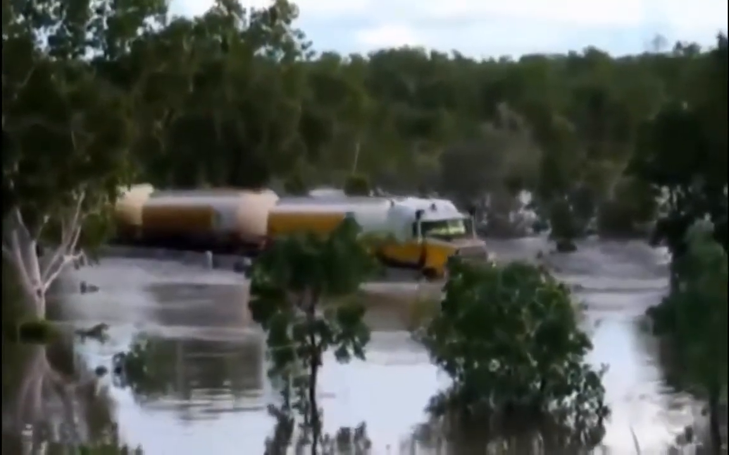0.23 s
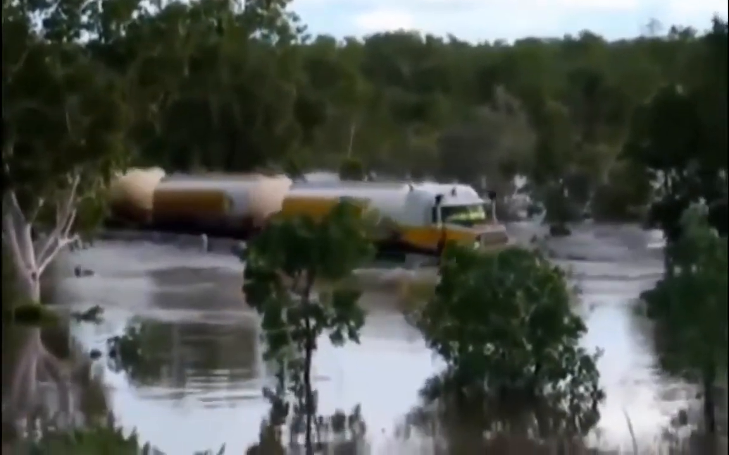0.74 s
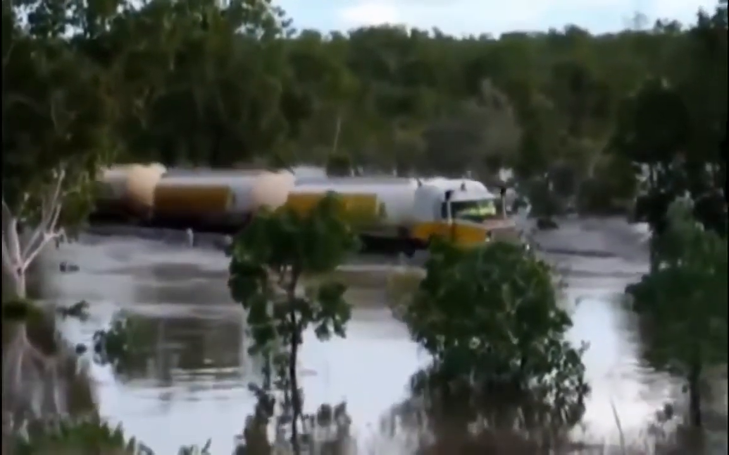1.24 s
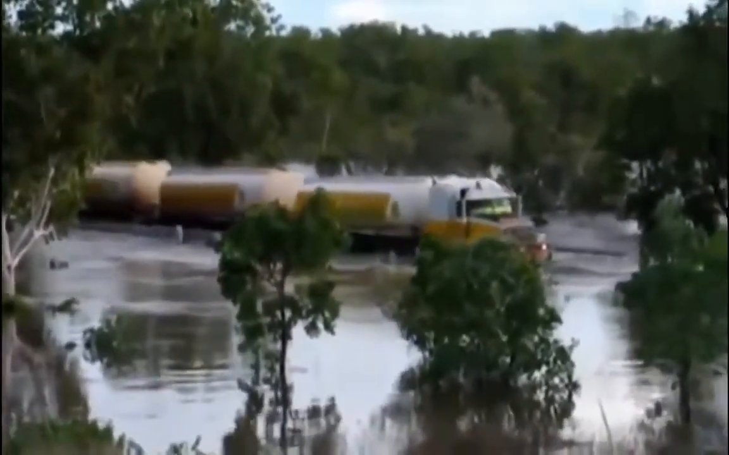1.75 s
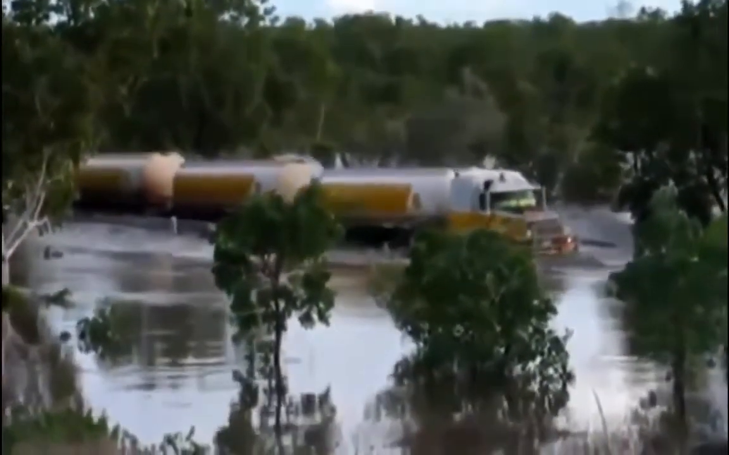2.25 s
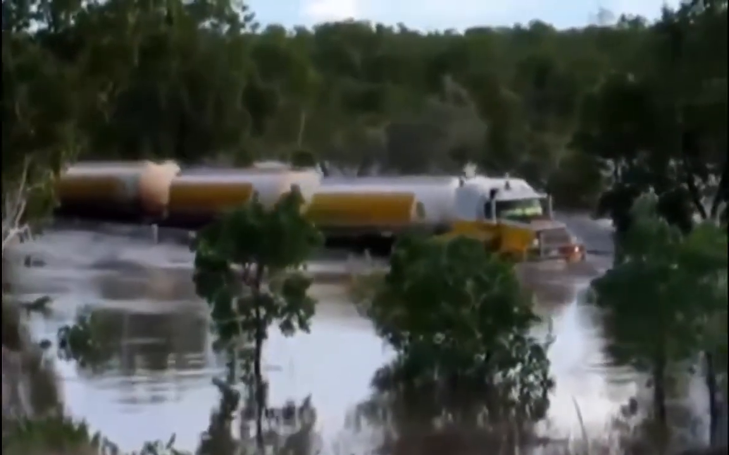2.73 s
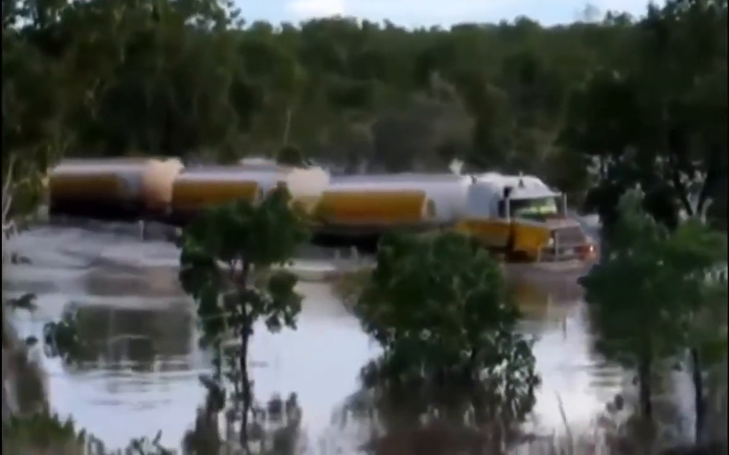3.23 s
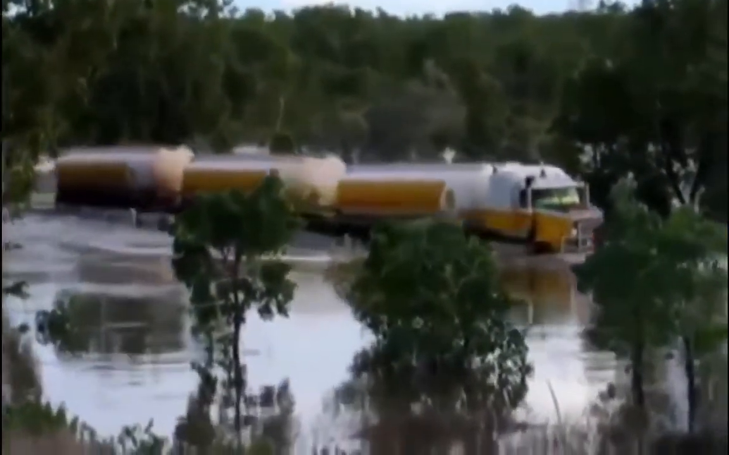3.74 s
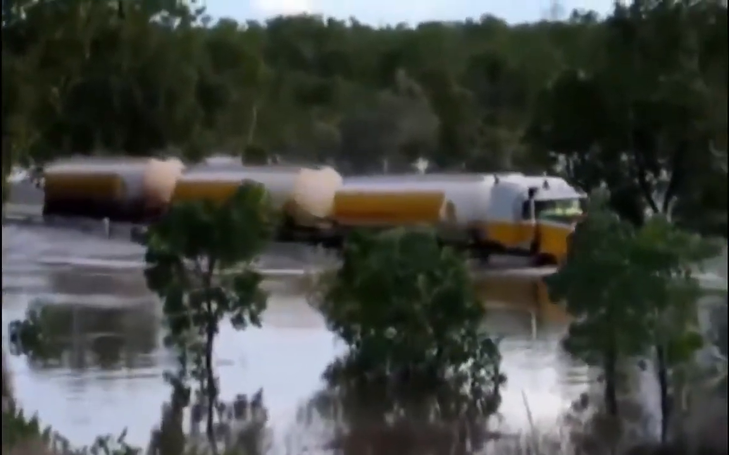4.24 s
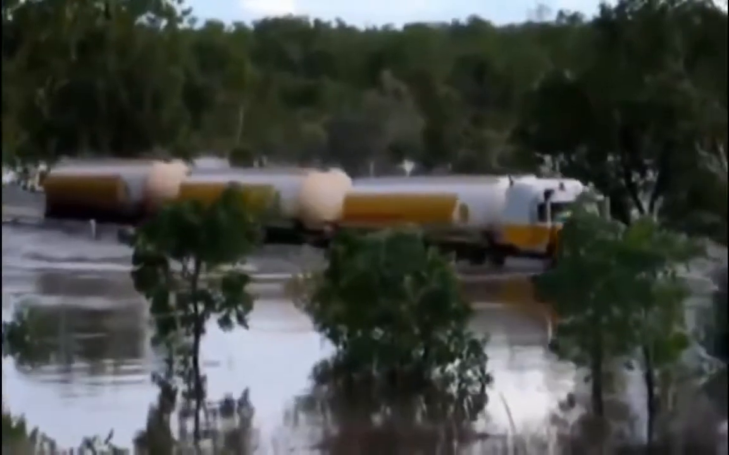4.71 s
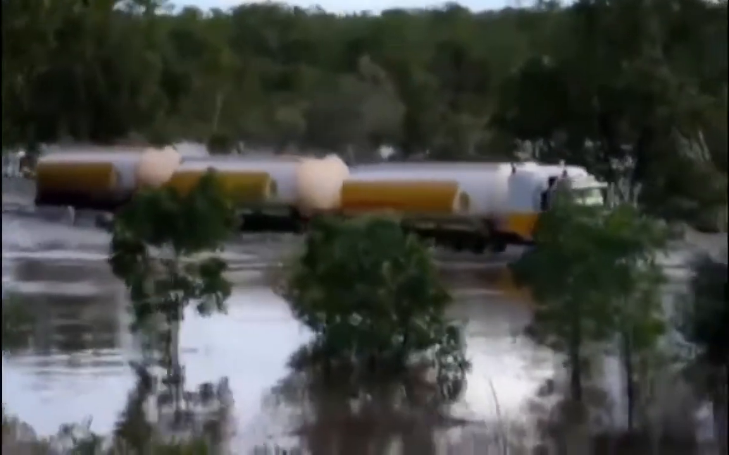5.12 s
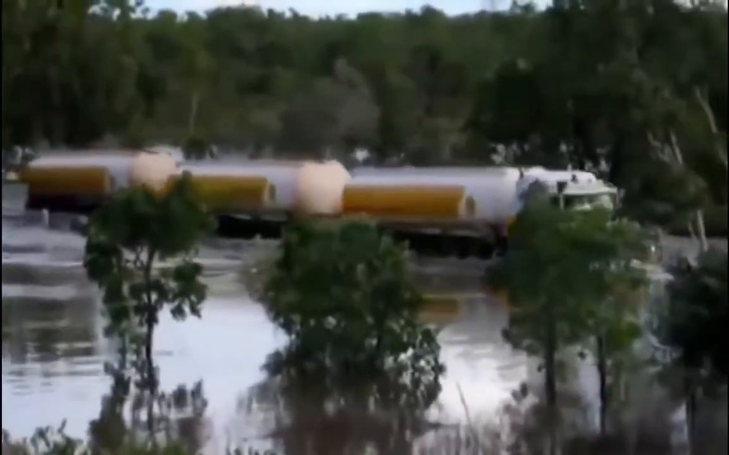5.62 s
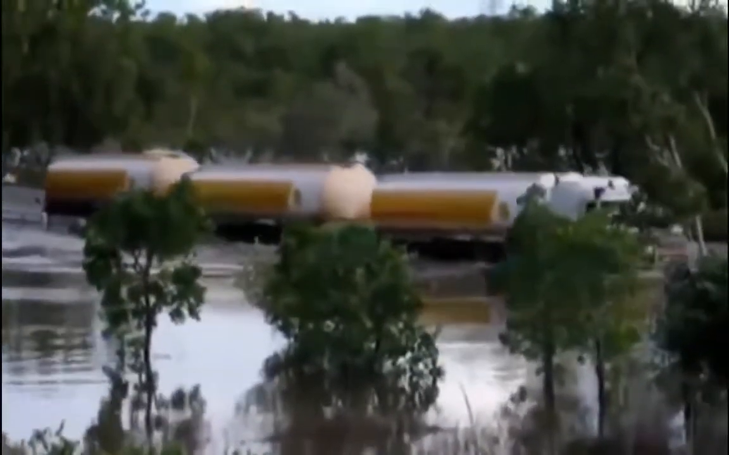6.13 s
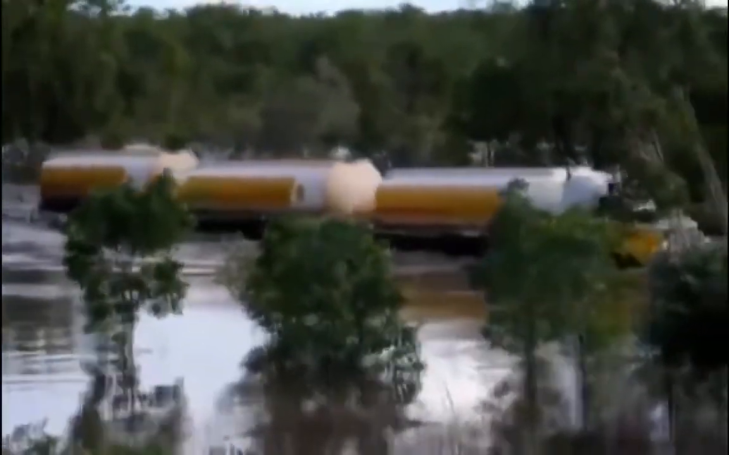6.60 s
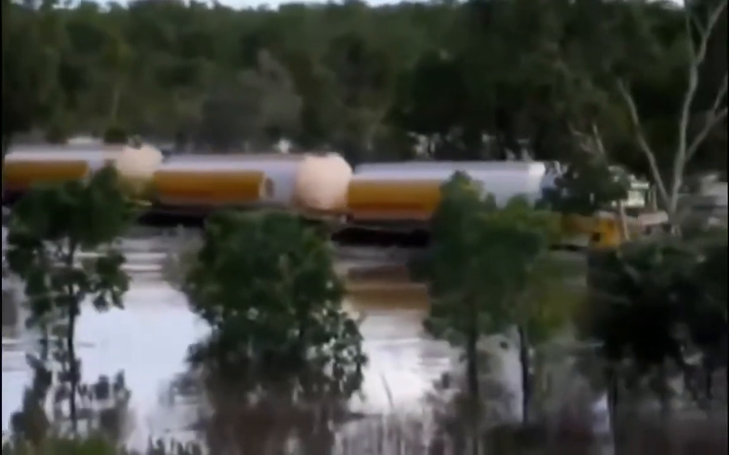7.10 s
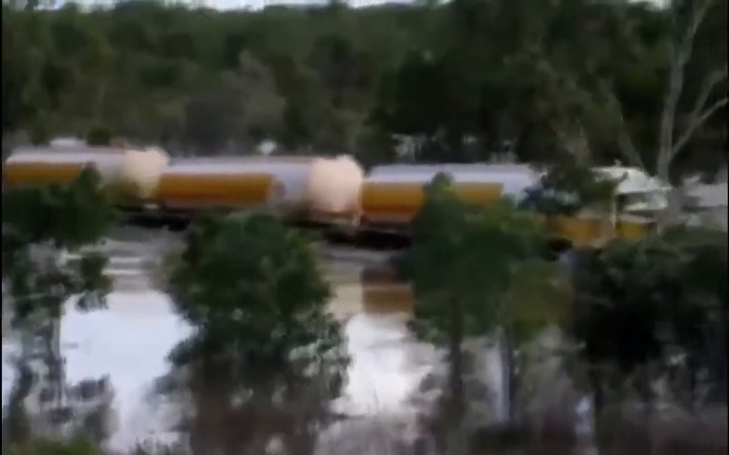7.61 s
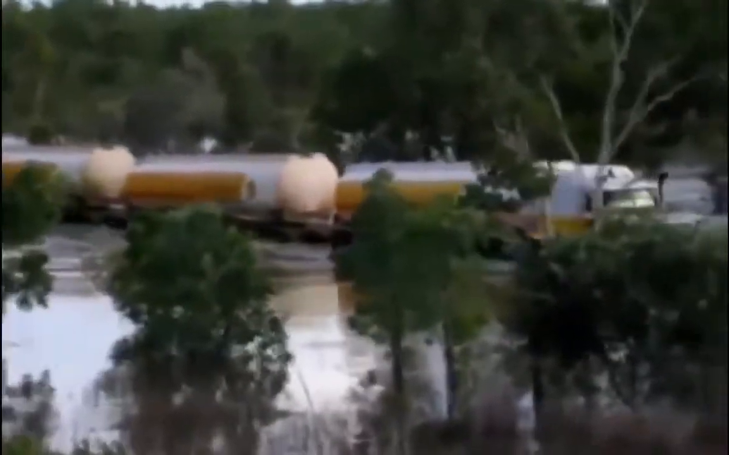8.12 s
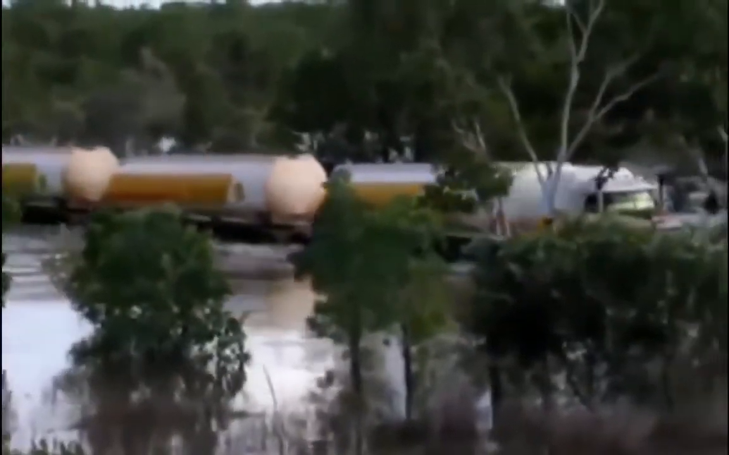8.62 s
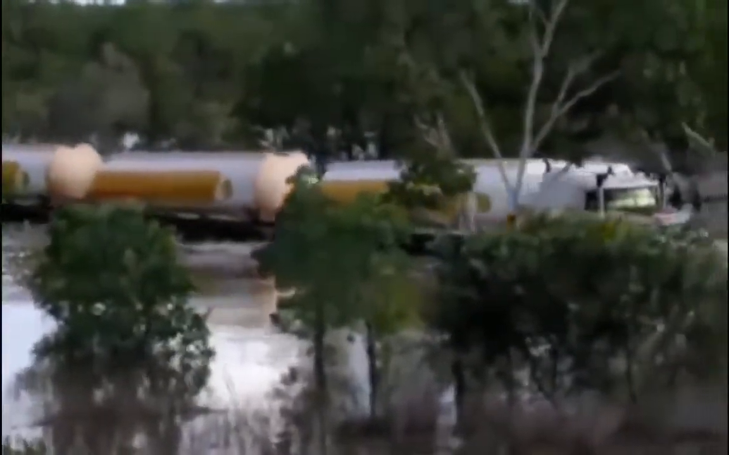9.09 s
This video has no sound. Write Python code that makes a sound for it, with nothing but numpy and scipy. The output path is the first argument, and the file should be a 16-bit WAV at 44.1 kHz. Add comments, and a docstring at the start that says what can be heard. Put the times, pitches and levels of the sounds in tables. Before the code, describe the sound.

A quiet wash of churning water gives way abruptly to a wading tanker truck's loud diesel drone and gusty wind rumble.

```python
"""A road train's diesel drones as the truck wades through flood water.
First only its wash is heard: rush, churn, two sheets of spray, plus a faint far hum and one tick.
At 4.2 s the engine cuts in loud: exhaust harmonics, a broad roar, a raspy whine that swells twice.
Wind buffets the microphone; the recorder clips and turns down briefly after the hardest gusts."""
import sys
import numpy as np
from scipy import signal
from scipy.fft import rfft, irfft, next_fast_len
from scipy.io import wavfile
from scipy.ndimage import uniform_filter1d, map_coordinates

SR = 44100
rng = np.random.default_rng(int(sys.argv[2]) if len(sys.argv) > 2 else 0)


def unload_audio(sound):
    """Save the sound as a 16-bit wav file, at the path given as the first command line argument."""
    columns = np.transpose(np.atleast_2d(sound))
    # keep every value between -1 and 1, then stretch to whole-number steps
    steps = np.round(np.clip(columns, -1, 1) * 32767)
    wavfile.write(sys.argv[1], SR, steps.astype(np.int16))


N = 412335

# wash: time_s, rush_db, spray_db
WASH_LEVELS = [(0, -39, -48.5), (.7, -40, -50.5), (1.33, -39.8, -51), (1.55, -38.5, -47), (1.9, -38, -48),
               (2.3, -38.3, -44), (3.1, -38.8, -47), (4.2, -37.5, -46.5)]
# churning water: time_s, level_db
CHURN_LEVEL = [(0, -51.5), (1.35, -56.5), (1.6, -47), (2.3, -49), (2.8, -45.5), (3.05, -54), (4.2, -49)]
# sheets of spray: peak_s, level_db, rise_s
SPRAY_SHEETS = [(2.82, -37.5, 0.26), (4.09, -37, 0.079)]
# far engine: time_s, pitch_hz, level_db
FAR_HUM = [(0, 129.8, -48), (.65, 133.6, -51), (1.15, 133.5, -49.5), (1.55, 125.8, -50),
           (2.0, 127.5, -45.5), (2.35, 133.5, -46), (2.75, 128.8, -46), (3.1, 124.2, -48),
           (4.2, 123.4, -45.5)]
# deep hum: time_s, pitch_hz, level_db
DEEP_HUM = [(2.0, 25, -70), (2.3, 28.1, -55), (2.85, 41.8, -50), (3.6, 36.8, -63), (4.2, 36, -54)]

# near engine: time_s, firing_hz
FIRING_RATE = [(4.2, 83), (4.8, 81.3), (5.8, 81.4), (6.4, 80.2), (7.3, 80.4), (8.3, 80.5), (9.35, 81)]
# exhaust boom: time_s, harmonic2_db, harmonic3_db
BOOM_LEVELS = [(4.2, -17.5, -23), (4.75, -17.5, -22), (5.12, -22, -21.5), (5.28, -14.5, -22),
               (5.5, -17.5, -17.5), (5.88, -13, -20), (6.0, -19.5, -22), (6.2, -15.5, -20.5),
               (6.55, -14, -24.5), (7.0, -18.5, -19.5), (7.6, -17, -20.5), (7.95, -15, -16),
               (8.2, -16.5, -23.5), (8.45, -13, -16), (9.35, -11.5, -14)]
# engine roar: time_s, level_db
ROAR_ENVELOPE = [(4.2, -21), (4.6, -24), (5.3, -23.5), (5.85, -21), (6.3, -24), (7.1, -21), (7.5, -24),
                 (7.9, -18.5), (8.2, -22), (8.5, -17.5), (9.35, -16.5)]
# weak exhaust orders at peak roar: firing_multiple, level_re_roar_db
EXHAUST_ORDERS = [(1, -16), (4, -16), (6, -15), (7, -16), (12, -21), (13, -21)]
# hum beside the drone: pitch_hz, level_re_roar_db
SIDE_TONES = [(70.5, -18), (174, -5.5)]
# whine swells: peak_s, level_db, rise_s, fall_s
WHINE_SWELLS = [(5.33, -31, .21, .13), (5.559, -25.5, 0.0394, .07), (5.809, -24.5, .15, .1),
                (8.56, -24, 0.25, .6)]
# wind rumble: time_s, level_db
WIND_LEVEL = [(4.2, -15), (4.55, -15.5), (4.9, -16.5), (5.5, -15.5), (6.2, -15.5), (6.7, -15.5),
              (7.5, -15.5), (8.25, -14.5), (8.36, -23.5), (9.35, -20.5)]
# gusts: peak_s, half_width_s, rumble_db, bluster_db
WIND_GUSTS = [(4.238, .02, -12, -14), (4.36, 0.0043, -28.5, 4), (4.527, 0.062, -8.5, -10),
              (4.633, .025, -5, -19), (4.684, 0.0074, -13.5, 0.5), (4.871, 0.026, -17.5, -17),
              (5.04, 0.043, -7.5, -22), (5.313, .025, -9, -15.5), (5.40, 0.018, -13.5, -12),
              (5.578, .02, -15, -21), (5.663, 0.013, -15, -12.5), (5.79, 0.017, -21.5, -10.5),
              (5.946, 0.014, -9, -7), (6.11, .02, -16, -16), (6.222, 0.018, -19, -5),
              (6.29, 0.037, -12, -15), (6.364, 0.0063, -15.5, 0.5), (6.544, .006, -8.5, -0.5),
              (6.85, .025, -5, -17), (7.022, .025, -11, -11), (7.315, .013, -12.5, -4.5),
              (7.435, 0.0069, -10, 1), (7.603, 0.04, -8, -14), (8.147, .03, -7, -21),
              (8.225, 0.018, -8.5, -14.5)]
# dips in engine and wind: centre_s, half_width_s, depth_db
LEVEL_DIPS = [(4.733, .03, -0.5), (4.924, 0.015, 5.5), (5.122, .035, 5.5), (5.445, 0.034, 1.5),
              (5.993, 0.031, 5), (6.593, 0.021, 5), (6.892, 0.041, 4.5), (7.472, 0.034, 2),
              (8.099, .01, 6.5), (8.256, 0.0091, 6.5)]

# noise spectra: freq_hz, density_db
RUSH_SPECTRUM = [(15, -26), (30, -7), (80, 4.5), (150, 2.5), (230, 0.5), (400, 0), (520, -7), (870, -3.5),
                 (1380, -7.5), (1630, -2), (1850, -6), (2170, 2.5), (2700, -7), (4500, -12.5), (11000, -45)]
CHURN_SPECTRUM = [(300, -45), (620, -3.5), (860, 3.5), (1150, -1.5), (1700, -42.5)]
SPRAY_SPECTRUM = [(1500, -26), (2900, 3), (3500, -2.5), (4100, 3), (4700, -4), (5800, 2.5), (7600, -2),
                  (9000, -9), (10900, -10.5), (11200, -30), (15000, -31)]
TICK_SPECTRUM = [(1000, -25), (2000, -4), (3200, -0.5), (4500, -9), (10000, -17.5), (12000, -35)]
ROAR_SPECTRUM = [(60, -22.5), (180, 15), (380, -8), (560, 4.5), (760, 0.5), (1050, 3.5), (1350, -5),
                 (1600, -2.5), (1850, -6.5), (2120, -2), (3250, -8), (3800, -20.5), (4500, -28),
                 (5300, -44), (9000, -49.5), (15000, -61.5)]
RUMBLE_SPECTRUM = [(15, -32.5), (35, -8), (70, 1.5), (130, 1), (200, -3.5), (300, -7), (600, -28.5),
                   (1500, -102)]
BLUSTER_SPECTRUM = [(90, -7.5), (200, 7.5), (300, 3.5), (450, -0.5), (700, -14), (1400, -31.5), (3300, -46),
                    (4800, -91)]
# whine band and its whistling core: offset_from_centre_hz, density_db
WHINE_SIDEBANDS = [(130, 0), (250, -3), (420, -8), (700, -14), (1000, -30), (1800, -65)]
WHISTLE_SIDEBANDS = [(25, 0), (60, -14), (200, -45), (800, -120)]

TIME_S = np.arange(N) / SR


def amp(db):
    """Decibels to gain."""
    return 10 ** (np.asarray(db) / 20)


def unit_rms(x):
    """Scale to rms 1."""
    return x / np.sqrt(np.mean(x ** 2) + 1e-20)


def curves(rows):
    """Per-sample curve for each column after time_s."""
    times_s, *columns = np.transpose(rows)
    return [np.interp(TIME_S, times_s, column) for column in columns]


def bell(peak_s, rise_s, fall_s):
    """Two-sided Gaussian, height 1."""
    age_s = TIME_S - peak_s
    width_s = np.where(age_s < 0, rise_s, fall_s)
    return np.exp(-np.minimum((age_s / width_s) ** 2, 20))


def wobble(rate_hz):
    """Smooth random curve, rate_hz knots a second."""
    knots = rng.standard_normal(int(N * rate_hz / SR) + 4)
    return map_coordinates(knots, [TIME_S * rate_hz])


def filtered(x, response):
    """FFT filter with gain response(hz)."""
    size = next_fast_len(N + 8192)
    return irfft(rfft(x, size) * response(np.fft.rfftfreq(size, 1 / SR)), size)[:N]


def noise(spectrum, patchy_db):
    """Coloured noise, rms 1, with random gain patches in time and frequency."""
    bins = signal.stft(rng.standard_normal(N), nperseg=512)[2]
    patches = uniform_filter1d(rng.standard_normal(bins.shape), size=5, axis=0)
    patches = unit_rms(uniform_filter1d(patches, size=8, axis=1))
    patchy = signal.istft(bins * amp(patchy_db * patches), nperseg=512)[1][:N]
    freq_hz, density_db = np.transpose(spectrum)
    response = lambda hz: amp(np.interp(np.log(hz + 1), np.log(freq_hz), density_db))
    return unit_rms(filtered(patchy, response))


def to_cycles(hz):
    """Integrate frequency to phase."""
    return np.cumsum(hz) / SR


def tone(cycles):
    """Sine, rms 1, random start phase."""
    return np.sqrt(2) * np.sin(2 * np.pi * (cycles + rng.random()))


def wash():
    """Water rushes and churns along the trailers; two sheets of spray rise and collapse."""
    rush_db, spray_db = curves(WASH_LEVELS)
    sheets = sum(amp(db) * bell(peak_s, rise_s, fall_s=0.057) for peak_s, db, rise_s in SPRAY_SHEETS)
    rush = np.hypot(amp(rush_db), amp(-2) * sheets) * noise(RUSH_SPECTRUM, patchy_db=1)
    churn = amp(curves(CHURN_LEVEL)[0]) * noise(CHURN_SPECTRUM, patchy_db=1.2)
    spray = np.hypot(amp(spray_db), sheets) * noise(SPRAY_SPECTRUM, patchy_db=2)
    return rush + churn + spray


def far_engine():
    """Distant engine: four wavering partials."""
    pitch_hz, level_db = curves(FAR_HUM)
    cycles = to_cycles(pitch_hz)

    def partial(ratio, db):
        gain = amp(level_db + db + 2.8 * wobble(8.05))
        return gain * tone(ratio * cycles + 0.029 * wobble(15))

    hum = partial(1, db=-0.5) + partial(1.125, db=-7.5)
    overtones = partial(2.79, db=-10.5) + partial(2.87, db=-6.5)
    return hum + overtones


def tick(start_s=1.552, level_db=-35, decay_s=0.009):
    """One bright, fast-decaying noise burst."""
    age_s = TIME_S - start_s
    envelope = (age_s > 0) * np.exp(-np.abs(age_s) / decay_s)
    return amp(level_db) * envelope * noise(TICK_SPECTRUM, patchy_db=1)


def deep_hum():
    """A low tone and its octave glide up, then sag."""
    pitch_hz, level_db = curves(DEEP_HUM)
    cycles = to_cycles(pitch_hz)
    return amp(level_db + 1.5 * wobble(6.5)) * (tone(cycles) + tone(2 * cycles))


def exhaust_boom(firing_cycles):
    """The pipe booms on firing harmonics 2 and 3, wavering more in strong wind."""
    second_db, third_db = curves(BOOM_LEVELS)
    wind_gain = amp(curves(WIND_LEVEL)[0])
    waver_db = 2.5 * wind_gain / wind_gain.max()
    second = amp(second_db + waver_db * wobble(13)) * tone(2 * firing_cycles + 0.015 * wobble(33))
    third = amp(third_db + waver_db * wobble(13)) * tone(3 * firing_cycles + 0.012 * wobble(47))
    return second + third


def exhaust_orders(firing_cycles, roar_db):
    """Weak firing harmonics; they swell more steeply than the roar."""
    orders = sum(amp(db + 1.2 * wobble(9)) * tone(multiple * firing_cycles + 0.04 * wobble(11))
                 for multiple, db in EXHAUST_ORDERS)
    gain = amp(roar_db)
    return gain * np.sqrt(gain / gain.max()) * orders


def side_hum(roar_db):
    """Two wavering tones off the firing harmonics, tracking the roar's level."""
    return sum(amp(roar_db + db + 1.2 * wobble(6)) * tone(hz * TIME_S + 0.23 * wobble(11))
               for hz, db in SIDE_TONES)


def roar(level_db):
    """Broad engine noise with a slight flutter."""
    return amp(level_db + 0.78 * wobble(45)) * noise(ROAR_SPECTRUM, patchy_db=2)


def whine(firing_cycles, base_hz=2870, sag_hz=239.4, wander_hz=59.87, rest_db=-46):
    """A whistle in a noise band that rasps with each firing; pitch sinks as it swells."""
    swells = sum(amp(db) * bell(peak_s, rise_s, fall_s) for peak_s, db, rise_s, fall_s in WHINE_SWELLS)
    gain = amp(rest_db) + swells
    cycles = to_cycles(base_hz - sag_hz * gain / gain.max() + wander_hz * wobble(9))
    firing_rad = 2 * np.pi * firing_cycles
    rasp_db = 1.5 * np.cos(firing_rad) + 1.1 * np.cos(5 * firing_rad)
    band = unit_rms(amp(rasp_db) * noise(WHINE_SIDEBANDS, patchy_db=-0.4) * tone(cycles))
    whistle = amp(-6.5) * noise(WHISTLE_SIDEBANDS, patchy_db=3.5) * tone(cycles)
    return gain * amp(0.3 * wobble(20)) * (band + whistle)


def wind(bluster_re_rumble_db=-7):
    """Wind on the microphone: deep rumble and lumpy bluster, both leaping in gusts."""
    level_db, = curves(WIND_LEVEL)
    rumble_gusts = bluster_gusts = 0
    for peak_s, half_width_s, rumble_db, bluster_db in WIND_GUSTS:
        gust = bell(peak_s, half_width_s, half_width_s)
        rumble_gusts += amp(rumble_db) * gust
        bluster_gusts += amp(bluster_db) * gust
    rumble_gain = np.hypot(amp(level_db + 1.6 * wobble(30)), rumble_gusts)
    rumble = rumble_gain * noise(RUMBLE_SPECTRUM, patchy_db=2)
    lumps = unit_rms(amp(5.3 * wobble(45)) * noise(BLUSTER_SPECTRUM, patchy_db=4.5))
    bluster = amp(level_db + bluster_re_rumble_db) * lumps
    return rumble + bluster + bluster_gusts * noise(BLUSTER_SPECTRUM, patchy_db=-0.5)


def scene(loud_start_s=4.208, crossfade_s=0.001):
    """Quiet wash, then abruptly loud engine and wind, with brief level dips."""
    quiet = wash() + tick() + far_engine() + deep_hum()
    firing_cycles = to_cycles(curves(FIRING_RATE)[0])
    roar_db, = curves(ROAR_ENVELOPE)
    exhaust = exhaust_boom(firing_cycles) + exhaust_orders(firing_cycles, roar_db)
    engine = exhaust + side_hum(roar_db) + roar(roar_db) + whine(firing_cycles)
    dip_db = sum(depth_db * bell(centre_s, half_s, half_s) for centre_s, half_s, depth_db in LEVEL_DIPS)
    loud = amp(-dip_db) * (engine + wind())
    mix = np.clip((TIME_S - loud_start_s) / crossfade_s, 0, 1)
    return ((1 - mix) * quiet + mix * loud)[None]


def gain_control(x, threshold_db=-8.5, attack_s=0.036, recovery_db_per_s=60.5):
    """Cuts gain by the level's excess over threshold; recovers at a steady rate."""
    step = 1 / (attack_s * SR)
    power = signal.lfilter([step], [1, step - 1], x ** 2)
    excess_db = np.maximum(10 * np.log10(power + 1e-12) - threshold_db, 0)
    ramp_db = recovery_db_per_s * TIME_S
    cut_db = np.maximum.accumulate(excess_db + ramp_db) - ramp_db
    return x * amp(-cut_db)


def record(dry):
    """Recorder: gain control, hard clip, treble roll-off, band limit."""
    ceiling, rolloff_hz, limit_hz = 0.365, 12000, 15830
    clipped = np.clip(gain_control(dry[0]), -ceiling, ceiling)
    return filtered(clipped, lambda hz: (hz < limit_hz) / np.sqrt(1 + (hz / rolloff_hz) ** 4))[None]


dry = scene()
out = record(dry)
unload_audio(out)
```